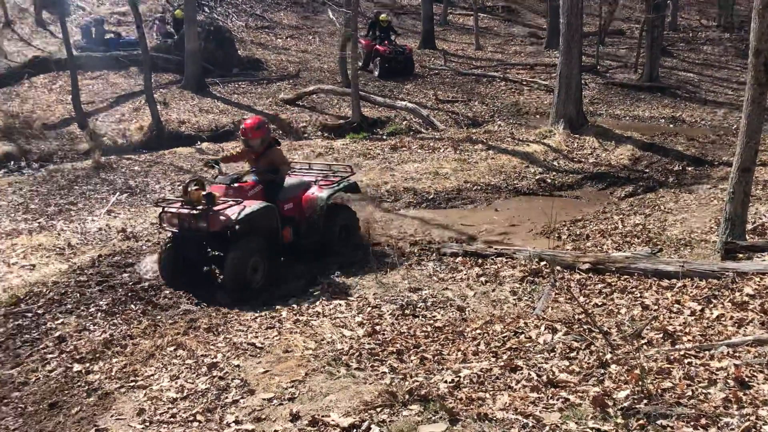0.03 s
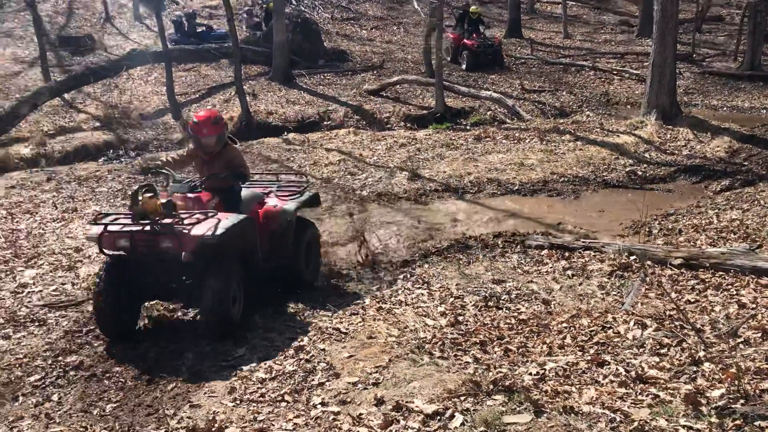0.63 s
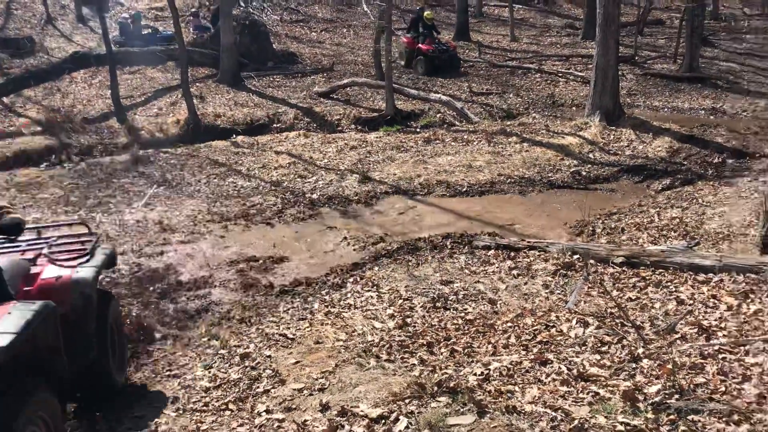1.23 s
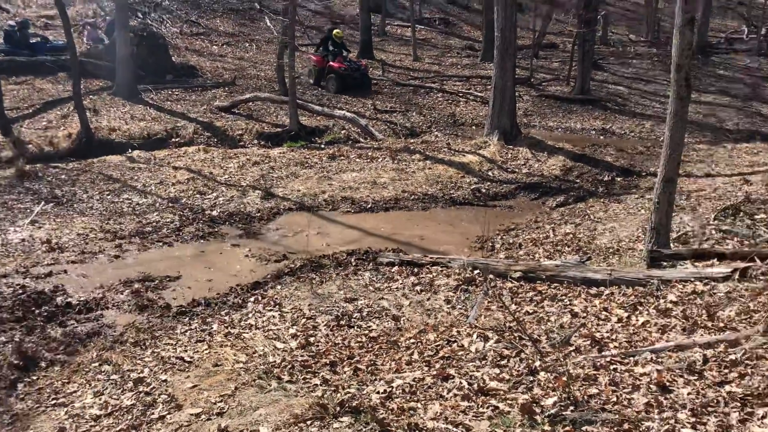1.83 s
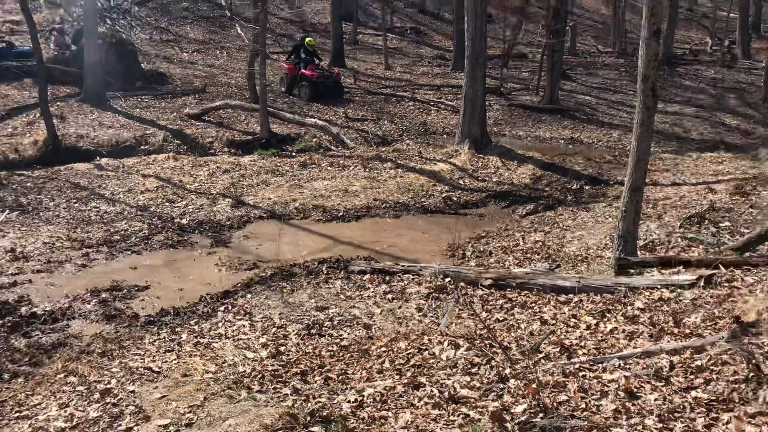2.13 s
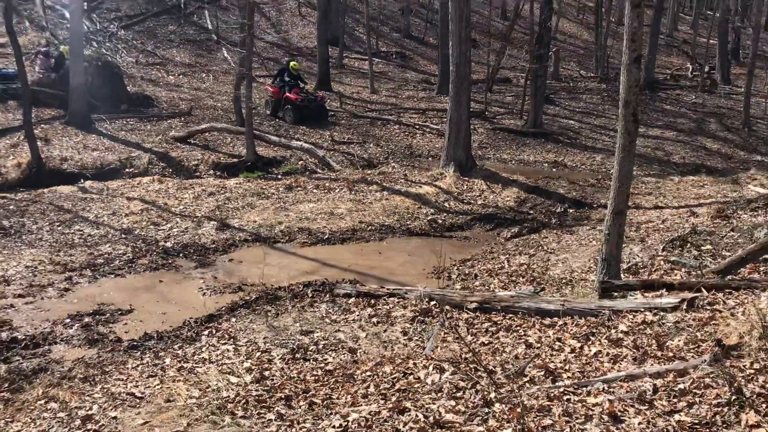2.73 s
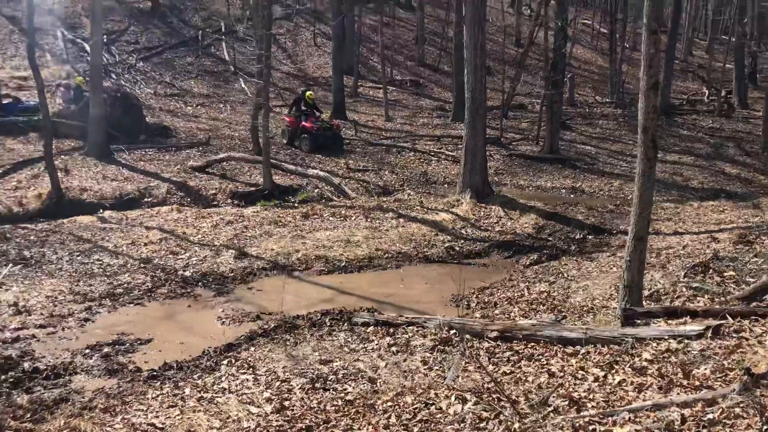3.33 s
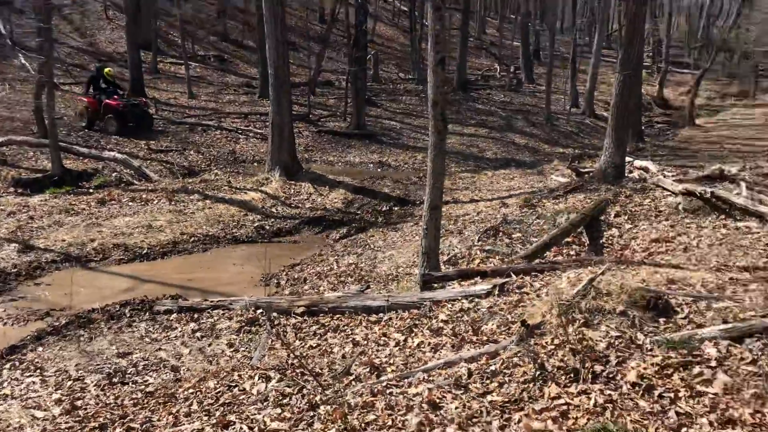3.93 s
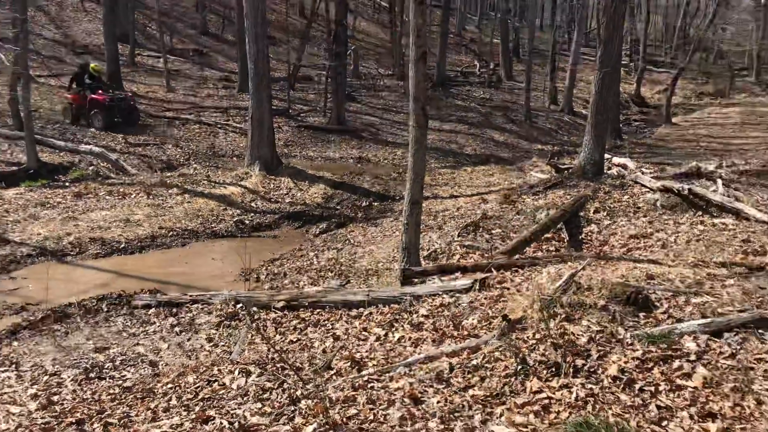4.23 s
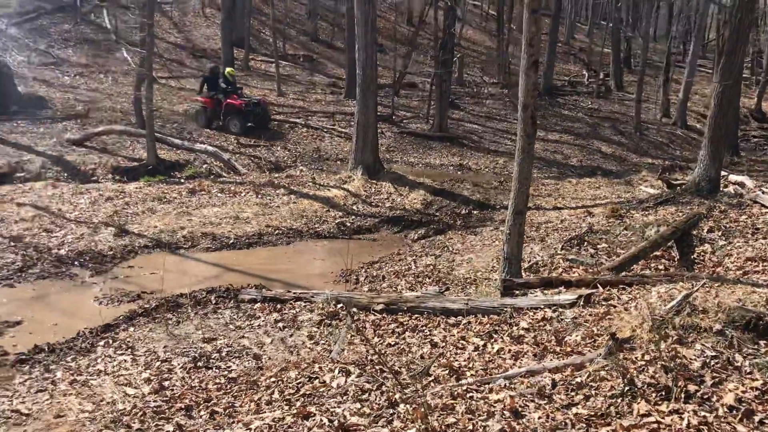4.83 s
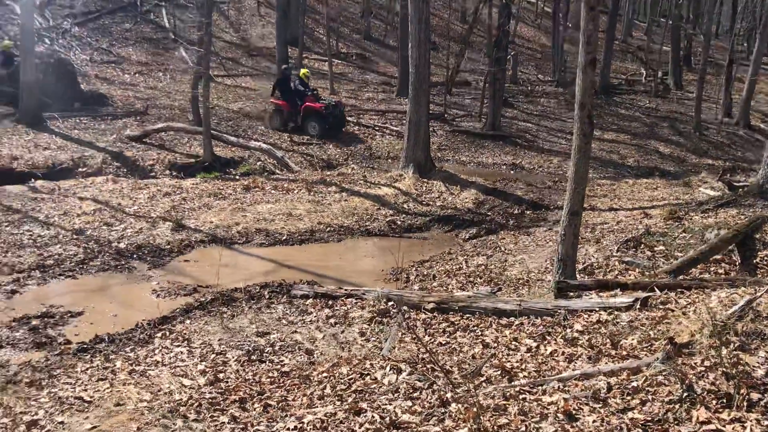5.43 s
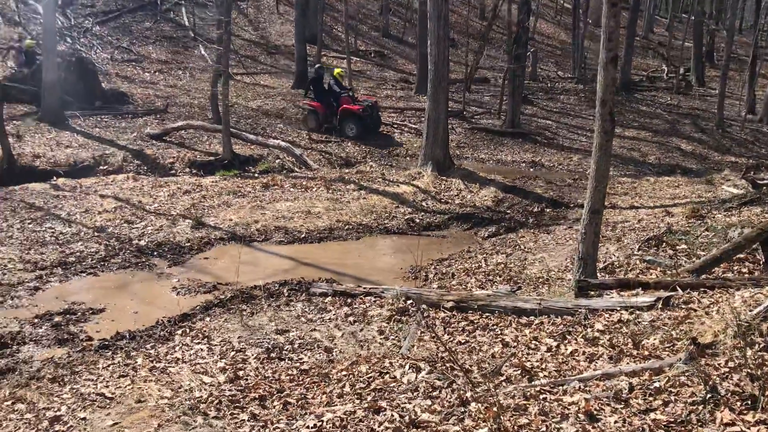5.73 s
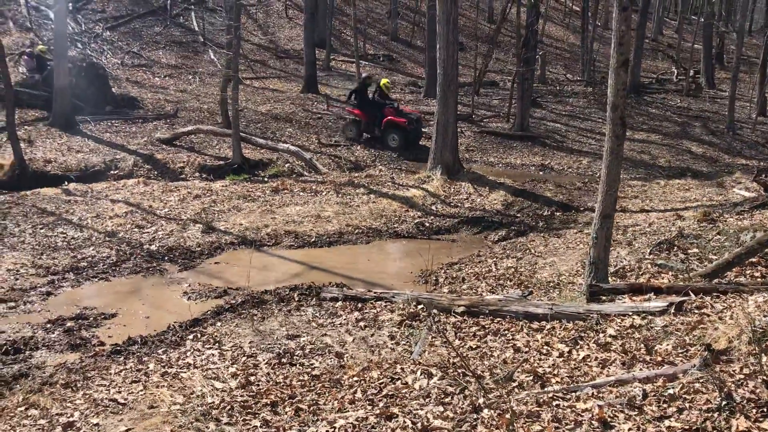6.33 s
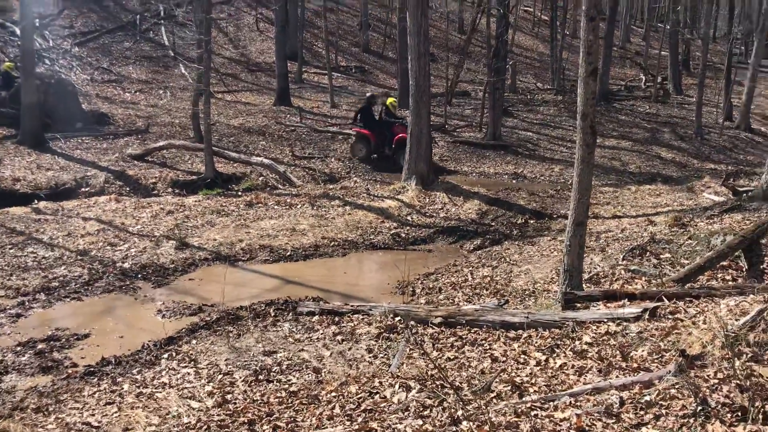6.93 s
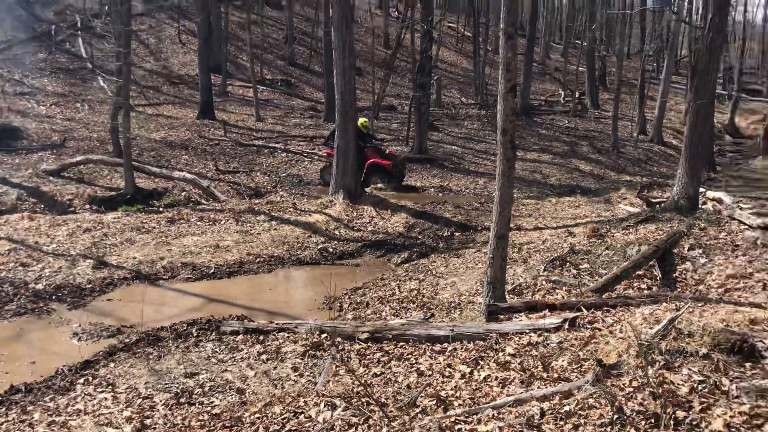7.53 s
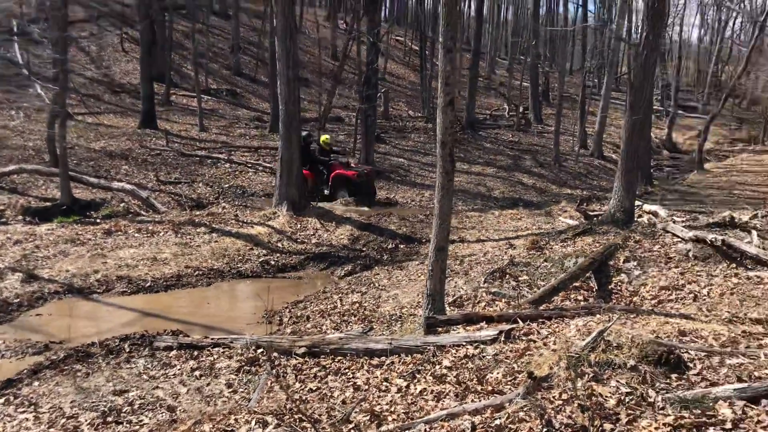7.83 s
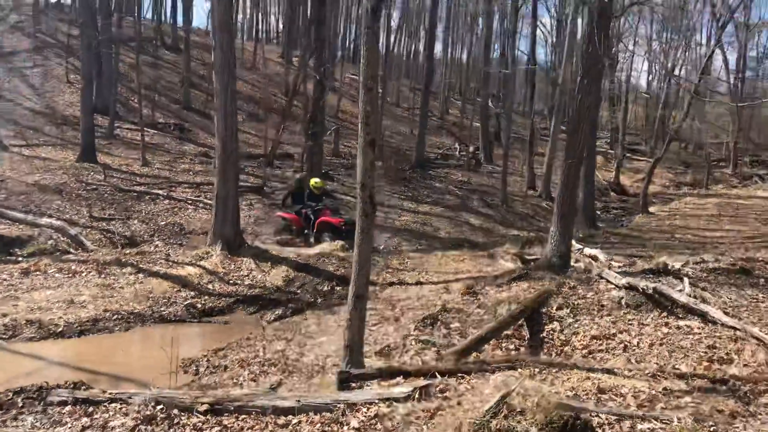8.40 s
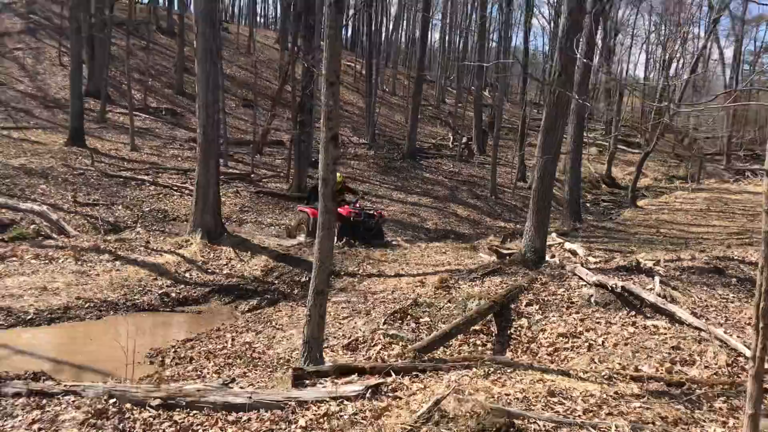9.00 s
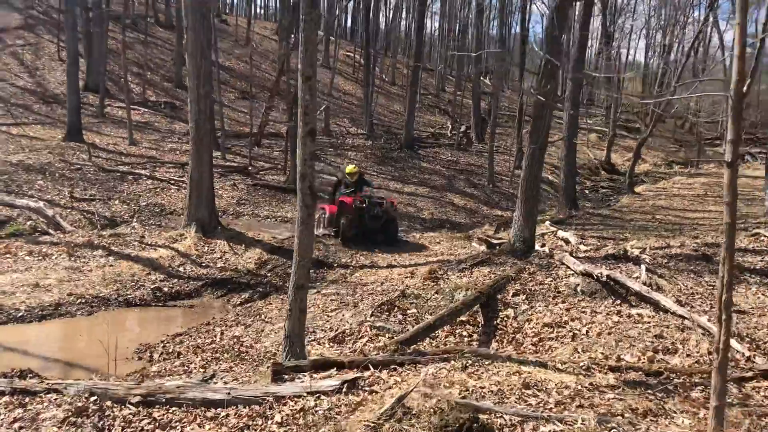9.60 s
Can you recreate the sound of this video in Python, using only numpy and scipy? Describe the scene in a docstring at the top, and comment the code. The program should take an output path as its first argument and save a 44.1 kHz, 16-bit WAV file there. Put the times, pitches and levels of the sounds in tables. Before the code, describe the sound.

In the woods, a single-cylinder quad passes very near with a throaty, rattling engine and a wet splatter from its wheels. It drops back with a few sharp knocks and low thumps, pulls again several times, then fades to a putter with one more short rev. Underneath, another quad chugs at idle, and a third grows louder late on as tyres swish through mud and leaves.

```python
"""A quad bike splashes out of a puddle on a woodland trail, passes close by, revs again and settles.
A second idles near by with a slow thump, and a third crawls closer through the trees.
Each engine is a source-filter system: a train of firing pulses excites its pipes and casing.
Tyres throw water, mud and dry leaves as noise; loose parts clack, a wet brake rings, trunks echo."""
import sys
import numpy as np
from scipy import signal
from scipy.fft import rfft, irfft
from scipy.io import wavfile

SR = 44100
rng = np.random.default_rng(int(sys.argv[2]) if len(sys.argv) > 2 else 0)


def digitize_waveform(pressure):
    """Quantize a signal to 16-bit integers and store it at the path in sys.argv[1].

    Rows of a 2-D input are taken as channels; values are limited to [-1, 1].
    """
    field = np.atleast_2d(pressure).T
    bounded = np.clip(field, -1, 1)
    quanta = np.round(bounded * 32767).astype(np.int16)
    wavfile.write(sys.argv[1], SR, quanta)


N = 426006
TIME = np.arange(N) / SR
CRUISE_HZ = 22  # firing rate of the passing quad at cruise


def passing_quad():
    """Periodic excitation: the firings of a single cylinder drive its exhaust, intake and loose parts."""
    # engine speed: t/s, firing rate/Hz
    firing_rate = [(0.0, 30.44), (0.22, 30.78), (0.46, 33.39), (0.69, 31.8), (0.99, 35.82), (1.18, 34.4),
                   (1.54, 20.75), (2.23, 14.12), (2.6, 21.49), (3.43, 22.16), (4.18, 27.64), (4.45, 23.72),
                   (4.68, 24.46), (5.05, 11.66), (5.54, 21.36), (5.95, 18.02), (6.22, 11.19), (6.69, 19.94),
                   (7.27, 17.94), (7.62, 22.18)]
    rate, opening = curve(firing_rate), throttle(lag_s=.023)
    pulses = firings(rate, start_turn=.6, jitter_s=.0001, uneven_db=.9)
    gas = puffs(pulses, rise_s=.00067, fall_s=.035, steady=.35)
    return (exhaust_boom(pulses, gas, opening) + exhaust_bark(pulses, gas, rate, opening)
            + pipe_note(pulses, gas, rate, opening) + intake_growl(pulses, gas, rate, opening)
            + exhaust_jet(pulses, opening) + heat_shield(pulses, opening) + gas_spit(pulses, opening)
            + clatter(pulses, opening) + valve_ticks(pulses, opening))


def exhaust_boom(pulses, gas, opening):
    """Impulse response: each firing thumps the silencer, with less turbulence under load."""
    # silencer spectrum: f/Hz, level/dB
    silencer = [(25, -54), (45, -10), (60, -2.5), (90, -18.5), (120, 1.5), (138, -6), (160, -32.5),
                (220, -20), (400, -58)]
    turbulence = .6 - .35 * opening
    boom = colour(delayed(pulses, .0074) + turbulence * gas, silencer, causal=.73)
    return boom * radiation(opening, idle_db=-17, throttle_db=3.5, rear_db=4)


def exhaust_bark(pulses, gas, rate, opening):
    """Pipe resonance: the valve releases runs of pressure waves; speed heats the gas and lifts the pitch."""
    # bark spectrum: f/Hz, level/dB
    pipe = [(100, -5), (165, 5.5), (200, 17.5), (250, -1), (300, 8.5), (350, 14), (400, -20), (460, -5.5),
            (540, -32), (660, 16), (800, -47), (1300, -23)]
    waves = sum(size * delayed(pulses, s)
                for s, size in [(.0003, .35), (.0041, .55), (.0112, .55), (.0181, .4), (.0252, .25)])
    rasp = colour(waves + .22 * gas, pipe, causal=.15)
    bark = resonate(rasp, hz=np.clip(11 * rate, 210, 305), width_hz=95)
    speed_gain = gain_of(1.36 * (rate - CRUISE_HZ))
    return bark * speed_gain * radiation(opening, idle_db=-46, throttle_db=7.5, rear_db=16.5)


def pipe_note(pulses, gas, rate, opening):
    """Sound travels faster in hot gas: the silencer's note climbs under throttle, with rough overtones."""
    # tailpipe overtones under load: f/Hz, level/dB
    tailpipe = [(140, -22), (170, -11), (212, -4), (238, -8), (272, 1), (302, 2), (335, -5), (385, -13),
                (465, -9), (530, -17), (660, -19), (800, -30), (1200, -50)]
    cold_hz, hot_hz, width_hz = 84.9, 129.4, 35.8
    heat = np.minimum(throttle(lag_s=.28) / .64, 1)
    hz = cold_hz + (hot_hz - cold_hz) * heat
    note = resonate(resonate(pulses, hz, width_hz), hz, width_hz)
    overtones = colour(pulses + .15 * gas, tailpipe, causal=.5)
    speed_gain = gain_of(.9 * (np.minimum(rate, 28) - CRUISE_HZ))
    return (note * radiation(opening, idle_db=-17.5, throttle_db=-4, rear_db=8)
            + overtones * speed_gain * radiation(opening, idle_db=-53.5, throttle_db=12.5, rear_db=19))


def intake_growl(pulses, gas, rate, opening):
    """Cavity resonance: gulps of air slosh unevenly in the airbox, whose growl follows the crank."""
    # intake spectrum: f/Hz, level/dB
    airbox = [(90, -52), (150, -5), (185, 14.5), (225, 2.5), (265, 9.5), (310, -14), (350, -19.5),
              (405, -4.5), (500, -11), (620, -4), (900, -13), (1500, -7)]
    gulps = sum(size * delayed(pulses, s) * gain_of(1.5 * drift(hz=25))
                for s, size in [(0, .7), (.0087, .6), (.0172, .3)])
    air = colour(gulps + .3 * gas, airbox, causal=.39)
    growl = resonate(air, hz=np.maximum(7 * rate, 200), width_hz=153)
    return growl * radiation(opening, idle_db=-19.5, throttle_db=8, rear_db=-15)


def exhaust_jet(pulses, opening):
    """Jet noise: each firing lets out a blast of turbulent hiss."""
    # jet spectrum: f/Hz, level/dB
    hiss = [(400, -10), (1000, -3), (2500, 9.5), (4000, 10), (6500, -8.5), (7600, -5), (9000, 1),
            (10500, -9), (12000, 1), (14000, -50), (16000, -52)]
    blasts = puffs(pulses, rise_s=.0045, fall_s=.0053, steady=.085)
    return colour(blasts, hiss) * radiation(opening, idle_db=-49, throttle_db=17, rear_db=1)


def heat_shield(pulses, opening):
    """Modal ringing: loose tin taps three times after each firing, each tap favouring other modes."""
    # modes of the tin: f/Hz, relative level/dB
    modes = [(1850, 0), (2200, -1), (3450, -1), (5250, -1), (5900, 0), (6900, -3), (9500, -5)]
    t60_s, chatter_s, uneven_db = .016, .013, 5.5
    out, t = np.zeros(N), TIME[:SR // 64]
    hz, db = np.transpose(modes)
    for s in np.repeat(TIME[pulses > 0], 3):
        sizes = gain_of(db + uneven_db * np.clip(rng.standard_normal(len(hz)), -1.5, 1.5))
        pitches = hz * rng.uniform(.97, 1.03, len(hz))
        tap = sizes @ np.sin(2 * np.pi * np.outer(pitches, t)) * gain_of(-60 * t / t60_s)
        add(out, s + chatter_s * rng.random(), tap)
    return evened(out) * radiation(opening, idle_db=-45, throttle_db=17, rear_db=0)


def gas_spit(pulses, opening):
    """Turbulence in short bursts: a sharp, uneven spit of gas at each firing."""
    # spit spectrum: f/Hz, level/dB
    spit = [(3000, -30), (7500, -6), (9000, -2), (10500, -5.5), (12200, 1), (14000, 2), (15000, -1),
            (16000, -7.5)]
    spurts = puffs(pulses * gain_of(2.5 * drift(hz=20)), rise_s=.002, fall_s=.0038, steady=0)
    return colour(spurts, spit) * radiation(opening, idle_db=-49.5, throttle_db=28, rear_db=-9.5)


def clatter(pulses, opening):
    """Amplitude modulation: mechanical noise pulses with the firings, among stray taps."""
    # clatter spectrum: f/Hz, level/dB
    machinery = [(200, -9.5), (400, 2.5), (620, 8), (780, 2.5), (1050, 5.5), (1400, 1), (1800, -2.5),
                 (2500, -6), (4000, -6.5), (9000, -18.5)]
    taps = puffs(pulses, rise_s=.0056, fall_s=.013, steady=1) + .45 * crackle(per_s=170, spread_db=-1)
    return colour(taps, machinery) * radiation(opening, idle_db=-29.5, throttle_db=9, rear_db=-7)


def valve_ticks(pulses, opening):
    """Impact noise: the valve gear ticks, and at times a loose part buzzes along in forced vibration."""
    # tick spectrum: f/Hz, level/dB
    tick = [(700, -40.5), (1400, 12), (1850, 2.5), (2600, -2), (4500, -8), (7000, -21), (12000, -17)]
    # spells of buzzing: start/s, end/s, level/dB
    rattles = [(5.497, 5.66, -56.5), (6.48, 7.02, -53.5), (7.2, 7.35, -57)]
    rattle = sum(gain_of(db) * ((TIME > start) & (TIME < end)) for start, end, db in rattles)
    tappets = puffs(pulses, rise_s=.00012, fall_s=.0085, steady=0)
    return colour(tappets, tick) * (radiation(opening, idle_db=-36, throttle_db=8, rear_db=-12) + rattle)


def throttle(lag_s):
    """First-order lag: the throttle opening, 0-1, trails the rider's hand."""
    # squeezes of the throttle: open/s, shut/s, opening/1
    squeezes = [(0, 0.295, 0.87), (0.295, 0.636, 0.88), (0.775, 0.966, 0.97), (1.003, 1.13, 0.62),
                (1.129, 1.29, 0.65), (2.26, 2.604, 0.72), (2.625, 3.475, 0.57), (3.467, 3.894, 0.59),
                (3.893, 4.307, 0.66), (4.51, 4.713, 0.67), (5.387, 5.73, 0.37), (6.44, 7.016, 0.16),
                (7.4, 7.694, 0.92)]
    asked = sum(opening * ((TIME >= start) & (TIME < shut)) for start, shut, opening in squeezes)
    pole = np.exp(-1 / (lag_s * SR))
    return asked[0] + signal.lfilter([1 - pole], [1, -pole], asked - asked[0])


def radiation(opening, idle_db, throttle_db, rear_db):
    """Directivity and spherical spreading: the gain of one part of the passing quad, raised by throttle."""
    # its path: t/s, distance/m, tailpipe turned to the listener/1
    path = [(0, 5, 0.12), (.9, 3.86, 0), (1.25, 2.47, 0.12), (1.75, 4, 0.4), (2.4, 4.47, 0.96),
            (4.3, 4.2, 1), (4.75, 4.9, 0.97), (5.15, 9.5, 0.55), (6.3, 11.6, 0.86), (7.6, 14, 0.74),
            (9.66, 6.4, 1)]
    distance, rear = curve(path), curve(path, column=2)
    return gain_of(idle_db + throttle_db * opening + rear_db * rear) / distance


def exhaust_pops(hz=92, length_s=.012):
    """Gaussian wave packets: single heavy thumps of the silencer."""
    # pops: t/s, peak level/dB
    pops = [(1.806, -11), (2.091, -8), (2.473, -8)]
    out, t = np.zeros(N), np.arange(-SR // 20, SR // 20) / SR
    for s, db in pops:
        add(out, s + t[0], gain_of(db) * np.cos(2 * np.pi * hz * t) * np.exp(-(t / length_s) ** 2))
    return out


def idling_quad():
    """Reflection: each slow firing bounces between the chambers of a big silencer and swells there."""
    # engine speed: t/s, firing rate/Hz
    firing_rate = [(0, 12.4), (.6, 11.5), (1.3, 12.2), (3, 12.3), (5, 12.4), (5.7, 11.45), (6.2, 12.4),
                   (6.6, 13.26), (7.3, 12.9), (8.1, 12.9), (8.7, 12), (9.66, 10.9)]
    # strength of the chugs: t/s, level/dB
    levels = [(0, -26), (1.3, -26), (2.2, -30), (4.4, -24.5), (5, -21.5), (5.6, -20), (6.3, -20),
              (8.3, -18.5), (8.8, -20.5), (9.66, -26)]
    # silencer spectrum: f/Hz, level/dB
    silencer = [(22, -39), (38, -26), (52, 12), (70, -4.5), (105, 0), (125, -12), (150, -3), (200, -24.5),
                (260, -20.5), (320, -53), (700, -72)]
    pulses = firings(curve(firing_rate), start_turn=.459, jitter_s=.001, uneven_db=1.6)
    gas = puffs(pulses, rise_s=.022, fall_s=.1, steady=.31)
    bounces = .4 * pulses + .85 * delayed(pulses, .0098) + .35 * delayed(pulses, .0205)
    chugs = evened(colour(bounces + .3 * gas, silencer, causal=.1))
    return chugs * gain_of(curve(levels))


def tyres():
    """Incoherent sources add in power: a lumpy wash of droplets and snapping leaves, plus splashes."""
    # steady wash: t/s, level/dB
    wash = [(0, -36.5), (1.1, -37), (1.4, -39), (2.1, -43), (2.8, -43), (3.3, -53), (4.3, -53),
            (5.2, -59.5), (7.3, -55.5), (7.7, -48), (8.9, -45.5), (9.35, -51.5), (9.66, -46.5)]
    # a wheel ploughs in: middle/s, length/s, level/dB, fine spray relative to that/dB
    splashes = [(0.49, 0.15, -39, -14), (0.89, 0.12, -33, -26), (1.492, 0.14, -48, 2),
                (1.706, 0.16, -37, -2.5), (2.37, 0.086, -42, -2), (3.6, 0.19, -55.5, 2),
                (4.89, 0.086, -54, -18), (6.11, 0.096, -61, 3), (7.977, 0.25, -46.5, -2.5),
                (8.173, 0.071, -47.5, -1), (8.754, 0.23, -42, -11), (8.985, 0.18, -49.5, -4),
                (9.17, 0.11, -49, -4)]
    # spectrum of water, mud and leaves: f/Hz, level/dB
    spray = [(300, 9.5), (900, 2.5), (2000, 2.5), (3500, 1), (5000, -1), (7000, -2.5), (7700, -6),
             (9000, -4.5), (10500, -11.5), (12000, -7), (14500, -10), (16000, -17)]
    # spectrum of fine spray: f/Hz, level/dB
    fizz = [(3000, -6), (6500, 3), (7700, -4), (9000, 2), (10500, -4), (12000, -1), (14000, 0),
            (16000, -10.5)]
    power, fine_power = gain_of(curve(wash)) ** 2, np.zeros(N)
    for s, length, db, fine_db in splashes:
        swell = gain_of(db) ** 2 * np.exp(-(2 * (TIME - s) / length) ** 2)
        power += swell
        fine_power += swell * gain_of(fine_db) ** 2
    grains = 1.287 * rng.standard_normal(N) + .63 * crackle(per_s=1400, spread_db=.5)
    droplets = 1.04 * rng.standard_normal(N) + .96 * crackle(per_s=3700, spread_db=1)
    lumps = gain_of(1.27 * drift(hz=39.3))
    return (colour(grains, spray) * np.sqrt(power) + colour(droplets, fizz) * np.sqrt(fine_power)) * lumps


def clacks():
    """Impact transients: hard parts knock, hollow panels clap, and small metal parts ring down."""
    # knocks of the rack and drive: t/s, peak level/dB, centre f/Hz, panel clap gain/dB
    knocks = [(0.897, -34, 4500, -27), (1.227, -21, 5000, -38), (1.41, -22.5, 1530, -38),
              (1.978, -18.5, 3280, -17.5), (2.075, -20, 4260, -16), (2.456, -27, 6000, -45),
              (5.677, -32, 12000, -70), (6.355, -32.5, 1810, -60), (8.643, -31, 7000, -60),
              (9.583, -31, 5044, -60)]
    # metal clinks: t/s, f/Hz, peak level/dB
    clinks = [(2.229, 3030, -29), (2.254, 3030, -37), (4.803, 6510, -37), (4.857, 6500, -40)]
    clink_t60_s = .03
    out, t = np.zeros(N), TIME[:SR // 8]
    panels = signal.butter(1, [220, 1500], "band", fs=SR, output="sos")
    knock_decay = np.exp(-t / .003) + .12 * np.exp(-t / .02)
    for s, db, hz, clap_db in knocks:
        band = signal.butter(3, [hz * .6, min(hz * 1.38, SR * .45)], "band", fs=SR, output="sos")
        knock = signal.sosfilt(band, rng.standard_normal(len(t)) * knock_decay)
        clap = signal.sosfilt(panels, rng.standard_normal(len(t)) * np.exp(-t / .011))
        add(out, s, gain_of(db) * knock / abs(knock).max() + gain_of(clap_db) * clap)
    for s, hz, db in clinks:
        add(out, s, gain_of(db - 60 * t / clink_t60_s) * np.sin(2 * np.pi * hz * t))
    return out


def brake():
    """Friction excites a resonance: a wet disc gives a thin, hissing ring that swells and fades."""
    # scrapes: start/s, length/s, f/Hz, level/dB
    scrapes = [(0.0, 0.79, 7250, -56), (1.847, 0.29, 6500, -51), (2.604, 1, 7060, -56)]
    out = np.zeros(N)
    for start, length, hz, db in scrapes:
        size = round(length * SR)
        ring = resonate(rng.standard_normal(size), np.full(size, hz), width_hz=290)
        add(out, start, gain_of(db) * ring * np.sin(np.linspace(0, np.pi, size)))
    return out


def far_quad():
    """Harmonic series: drone, ringing case and gear whine share one firing rate, dulled by the trees."""
    # engine speed: t/s, firing rate/Hz
    firing_rate = [(5.6, 38), (5.85, 37), (6.0, 35.9), (6.1, 38), (6.35, 35.3), (7.2, 39.2), (7.6, 40),
                   (8.0, 38.3), (8.3, 39), (8.75, 41.3), (9.05, 41.8), (9.45, 40), (9.66, 41.5)]
    # its approach: t/s, drone gain/dB, mechanical noise gain/dB
    levels = [(0, -24.5, -50), (5, -35.5, -49), (6.9, -36, -46.5), (7.5, -31, -43), (8, -33, -40),
              (8.55, -31, -40), (9, -21, -35.5), (9.66, -25.5, -38.5)]
    # silencer spectrum: f/Hz, level/dB
    silencer = [(30, -43), (55, -33.5), (80, 15), (115, -26), (140, -3.5), (170, 1.5), (230, -23),
                (330, -33), (420, -38.5), (600, -45), (1500, -83)]
    # singing overtones: harmonic number, level relative to the silencer/dB
    harmonics = [(8, -27), (9, -22), (10, -22), (11, -28), (12, -24), (14, -24), (15, -27), (18, -27),
                 (20, -31), (21, -30), (35, -32)]
    # engine case spectrum: f/Hz, level/dB
    casing = [(200, -26), (400, -1), (490, 15.5), (580, 14), (700, 13), (1150, 12), (1300, 12),
              (1420, 14.5), (1650, 13), (1800, 8), (2100, 0.5), (3500, 0), (8000, -56)]
    # gear whine: t/s, level relative to the mechanical noise/dB
    whine_levels = [(5.6, -25), (5.85, -2), (6.05, -6), (6.25, -2), (6.5, -16), (7.0, -14), (7.3, -3),
                    (7.8, -7), (8.3, -5), (8.8, -7), (9.05, -19), (9.66, -9)]
    gear_teeth = 15
    rate = curve(firing_rate) * (1 + .006 * drift(hz=12))
    angle = 2 * np.pi * np.cumsum(rate) / SR
    pulses = firings(rate, start_turn=0, jitter_s=.0001, uneven_db=.9)
    overtones = sum(np.sin(k * angle) * gain_of(db + 3 * drift(hz=9)) for k, db in harmonics)
    drone = (colour(pulses, silencer) + overtones) * gain_of(curve(levels))
    case = colour(.35 * pulses + .82 * puffs(pulses, rise_s=.002, fall_s=.008, steady=.45), casing)
    whine = np.sin(gear_teeth * angle) * gain_of(curve(whine_levels) + 3 * drift(hz=9))
    direct = drone + (case + whine) * gain_of(curve(levels, column=2))
    return .7 * direct + .35 * woods(direct, t60_s=.26)


def woods(x, t60_s):
    """Scattering: trunks return sparse echoes, while long waves diffract past them."""
    t = TIME[:SR]
    arrivals = (rng.random(SR) < 1500 / SR) & (t > .012)
    echoes = rng.standard_normal(SR) * arrivals * gain_of(-60 * t / t60_s)
    echoes = signal.sosfilt(signal.butter(2, 260, "high", fs=SR, output="sos"), echoes)
    return signal.oaconvolve(x, echoes / np.linalg.norm(echoes))[:N]


def firings(rate, start_turn, jitter_s, uneven_db):
    """Impulse train of mean power 1, one impulse a firing; no two burn alike."""
    turns = start_turn + np.cumsum(rate) / SR
    at = np.flatnonzero(np.diff(np.floor(turns)))
    late, size = rng.standard_normal((len(at), 2)).T
    at = np.clip(at + np.round(late * jitter_s * SR).astype(int), 0, N - 1)
    pulses = np.zeros(N)
    pulses[at] = gain_of(uneven_db * np.clip(size, -2, 2)) * np.sqrt(SR / rate[at])
    return evened(pulses)


def puffs(pulses, rise_s, fall_s, steady):
    """Modulated noise: it flares after each firing, over a steady share."""
    t = TIME[:SR // 8]
    flare = signal.oaconvolve(pulses, (1 - np.exp(-t / rise_s)) * np.exp(-t / fall_s))[:N]
    return evened((evened(flare) + steady) * rng.standard_normal(N))


def crackle(per_s, spread_db):
    """Shot noise: sparse ticks of random size and sign."""
    size = gain_of(spread_db * np.minimum(rng.exponential(1, N), 4))
    return evened(size * rng.choice([-1, 1], N) * (rng.random(N) < per_s / SR))


def drift(hz, size=8192):
    """Band-limited random fluctuation of rms 1, up to hz."""
    slow = irfft(rfft(rng.standard_normal(size)) * (np.fft.rfftfreq(size, N / SR / size) < hz))
    return np.interp(TIME, np.linspace(0, N / SR, size), evened(slow))


def colour(x, spectrum, causal=1, size=16384):
    """Unit-energy filter, so levels are relative: minimum phase (causal 1) rings, zero phase (0) swells."""
    hz, db = np.transpose(spectrum)
    log_hz = np.log(abs(np.fft.fftfreq(size, 1 / SR)) + 1)
    log_gain = np.log(gain_of(np.interp(log_hz, np.log(hz), db)))
    phase = -causal * signal.hilbert(log_gain).imag
    ring = np.fft.fftshift(np.fft.ifft(np.exp(log_gain + 1j * phase)).real)
    return signal.oaconvolve(x, ring / np.linalg.norm(ring))[size // 2:][:N]


def resonate(x, hz, width_hz):
    """Moving resonance by heterodyning: shift the curve hz down to zero, smooth, and shift back."""
    carrier = np.exp(2j * np.pi * np.cumsum(hz) / SR)
    pole = np.exp(-np.pi * width_hz / SR)
    return evened((carrier * signal.lfilter([1 - pole], [1, -pole], x / carrier)).real)


def gain_of(db):
    """Decibels to amplitude."""
    return 10 ** (np.asarray(db) / 20)


def evened(x):
    """Normalisation to rms 1."""
    return x / np.sqrt(np.mean(x ** 2) + 1e-20)


def curve(rows, column=1):
    """Linear interpolation of one column of a table in time."""
    rows = np.array(rows)
    return np.interp(TIME, rows[:, 0], rows[:, column])


def delayed(x, s):
    """Pure delay of s seconds."""
    return np.interp(TIME - s, TIME, x, left=0)


def add(mix, s, sound):
    """Superposes a sound on the mix at time s."""
    part = mix[max(round(s * SR), 0):][:len(sound)]
    part += sound[:len(part)]


def scene():
    """Superposition of three engines, the trail noises and their echoes among the trees."""
    close = passing_quad() + idling_quad() + tyres() + clacks() + exhaust_pops() + brake()
    return (close + gain_of(-12) * woods(close, t60_s=.3) + far_quad())[None]


def record(dry):
    """Band limiting and saturation: the deepest bass and top treble go, and large peaks are rounded."""
    low_hz, high_hz, ceiling = 28, 15900, .56
    dry = signal.sosfiltfilt(signal.butter(3, low_hz, "high", fs=SR, output="sos"), dry)
    rounded = dry / (1 + (dry / ceiling) ** 6) ** (1 / 6)
    lowpass = signal.firwin(511, high_hz, window=("kaiser", 9), fs=SR)
    return signal.oaconvolve(rounded, lowpass[None], "same")


dry = scene()
out = record(dry)
digitize_waveform(out)
```